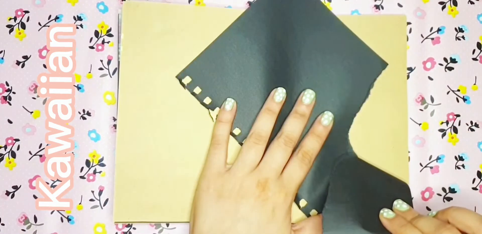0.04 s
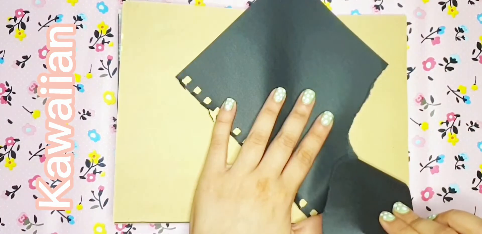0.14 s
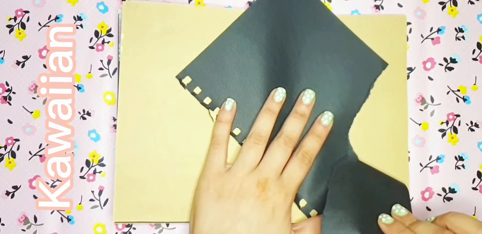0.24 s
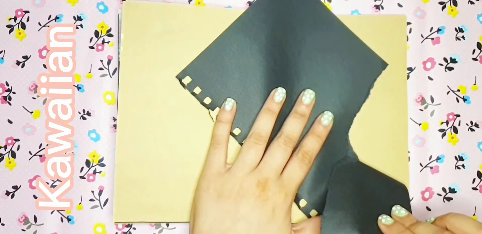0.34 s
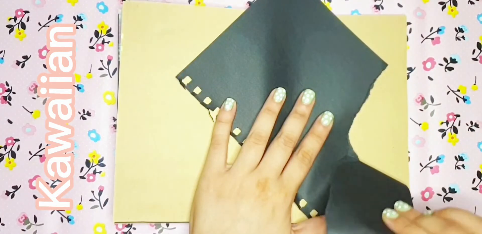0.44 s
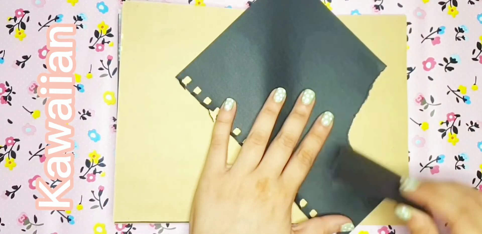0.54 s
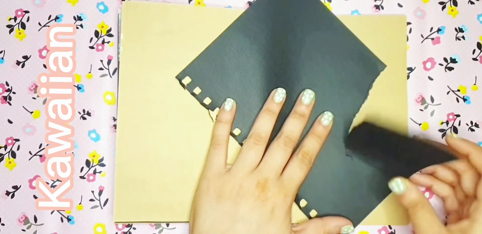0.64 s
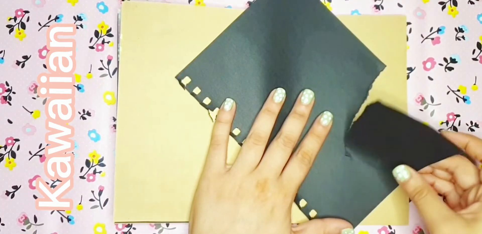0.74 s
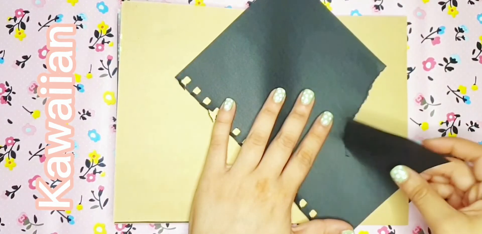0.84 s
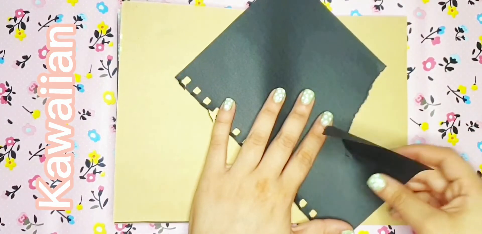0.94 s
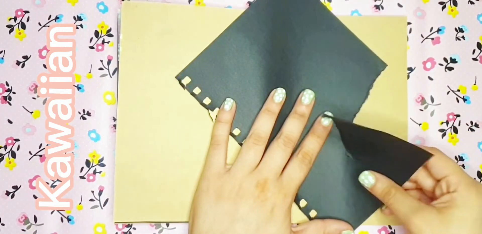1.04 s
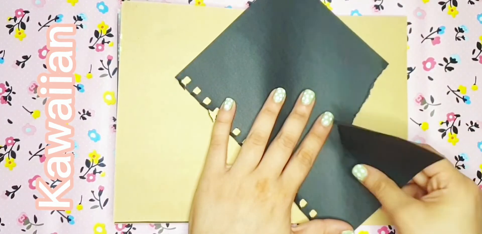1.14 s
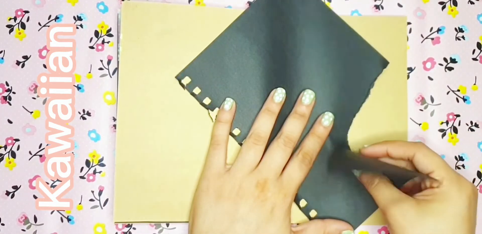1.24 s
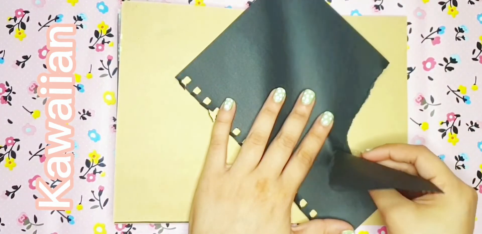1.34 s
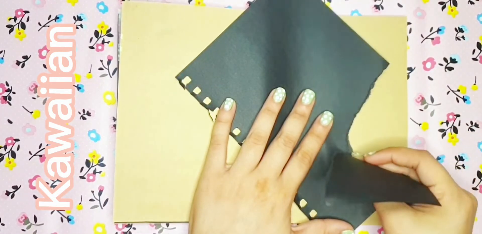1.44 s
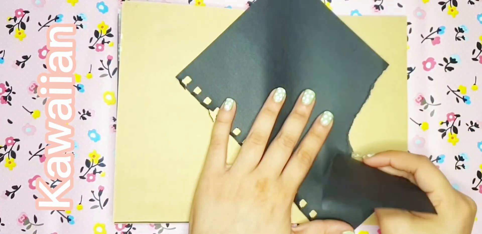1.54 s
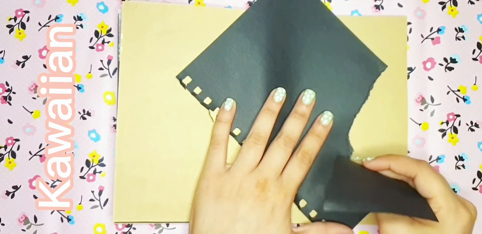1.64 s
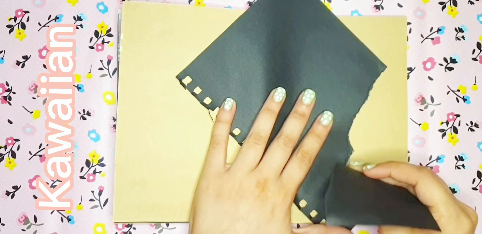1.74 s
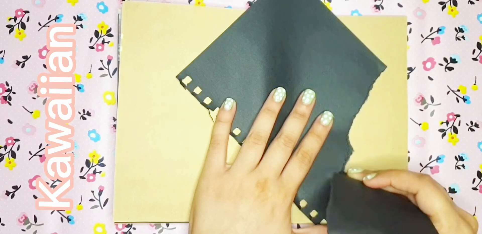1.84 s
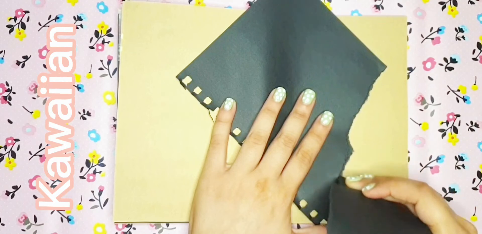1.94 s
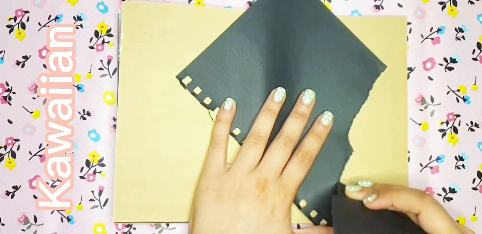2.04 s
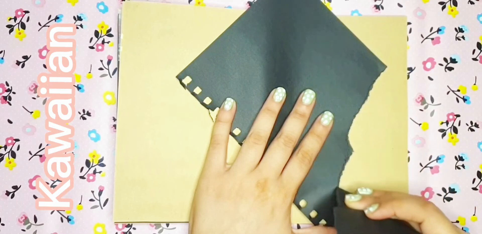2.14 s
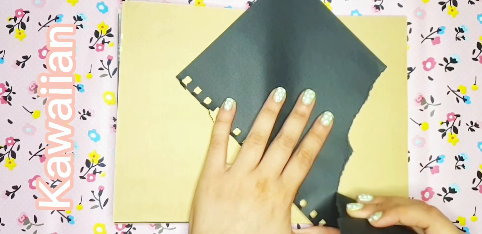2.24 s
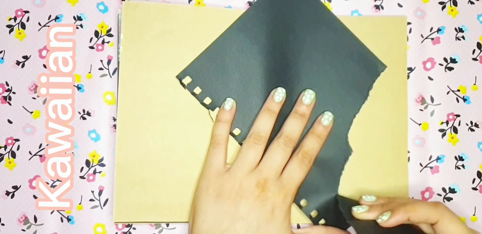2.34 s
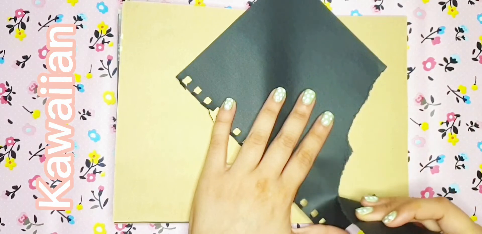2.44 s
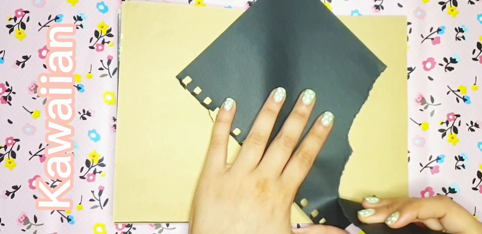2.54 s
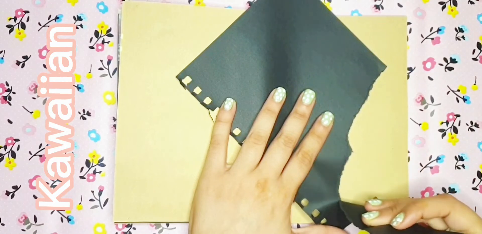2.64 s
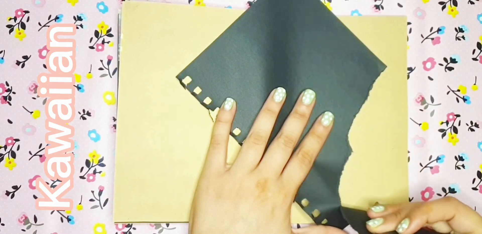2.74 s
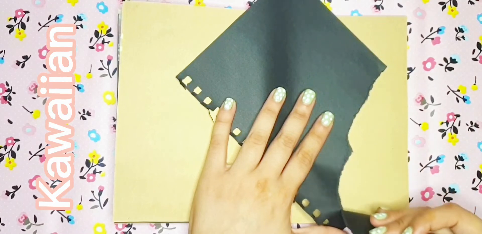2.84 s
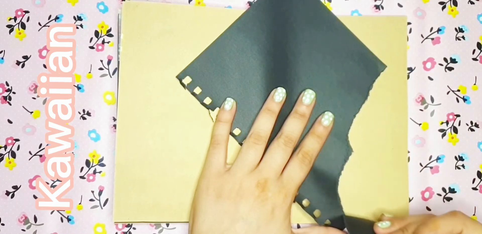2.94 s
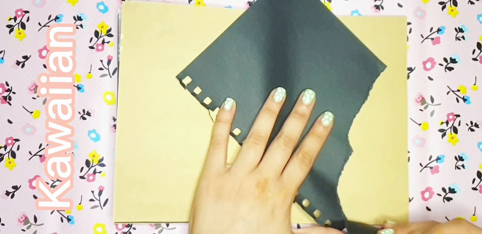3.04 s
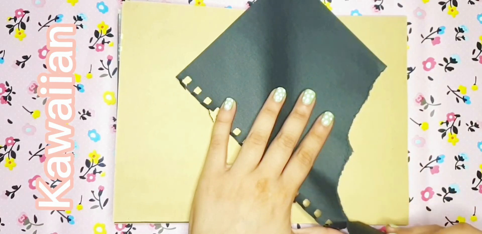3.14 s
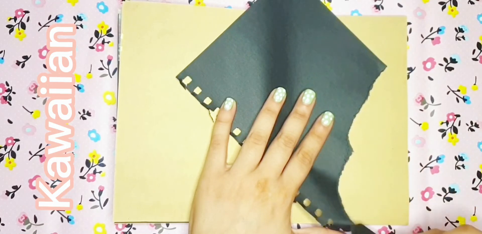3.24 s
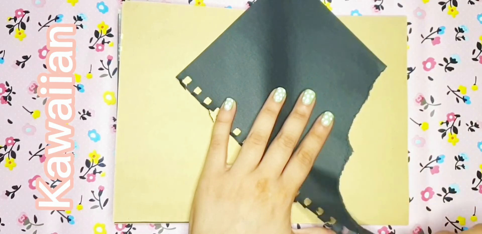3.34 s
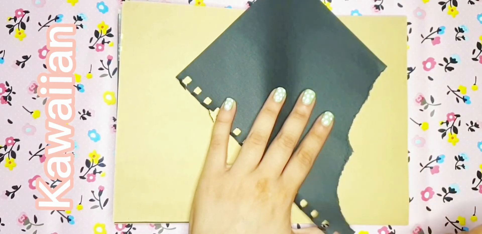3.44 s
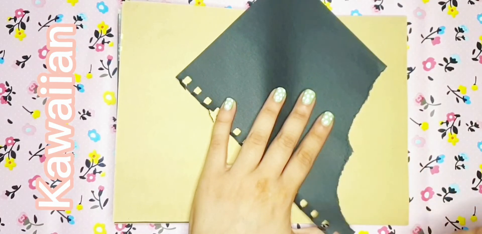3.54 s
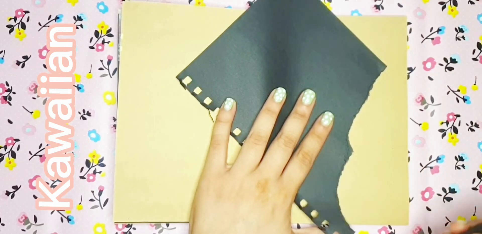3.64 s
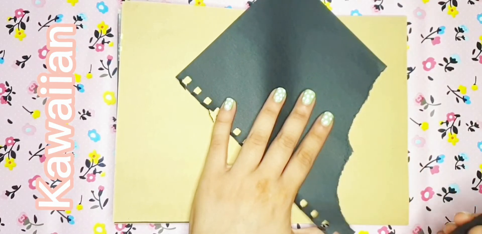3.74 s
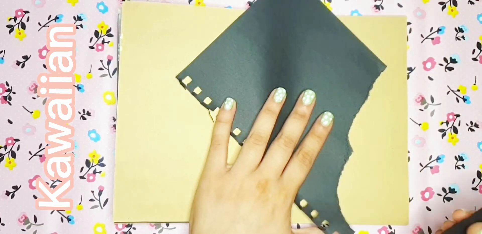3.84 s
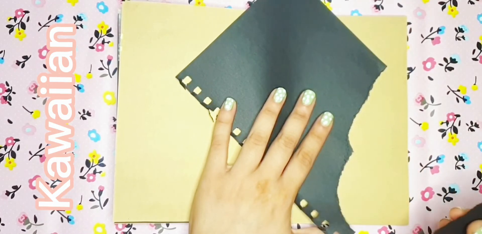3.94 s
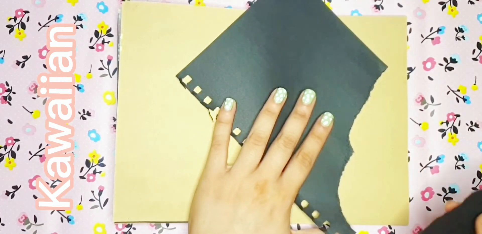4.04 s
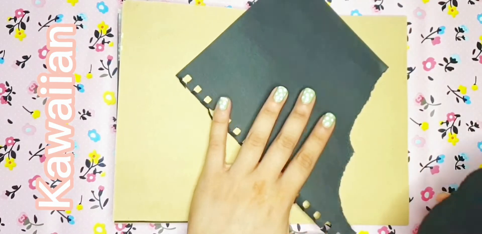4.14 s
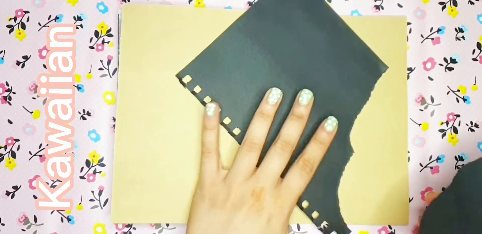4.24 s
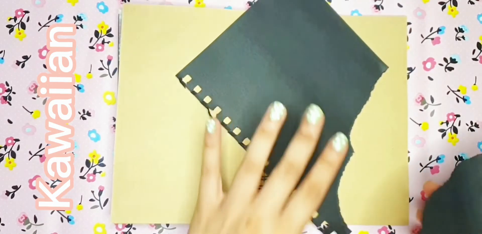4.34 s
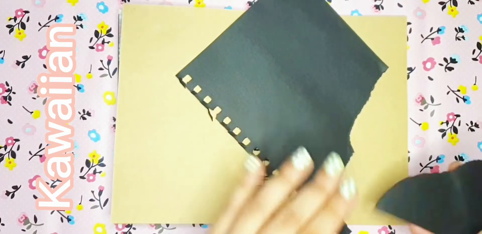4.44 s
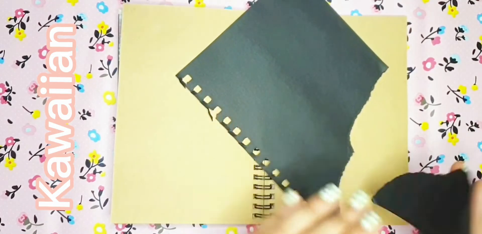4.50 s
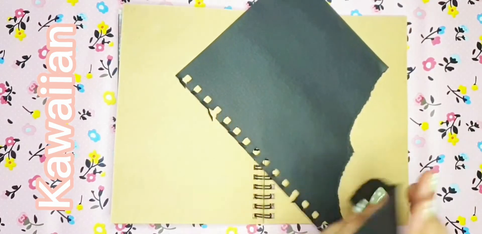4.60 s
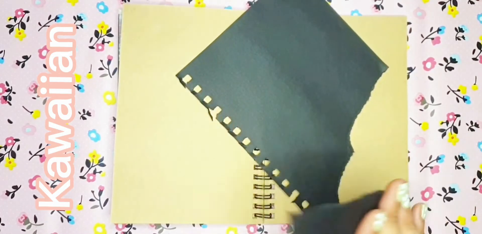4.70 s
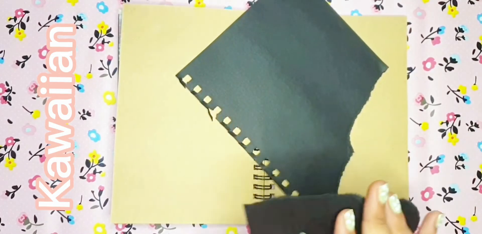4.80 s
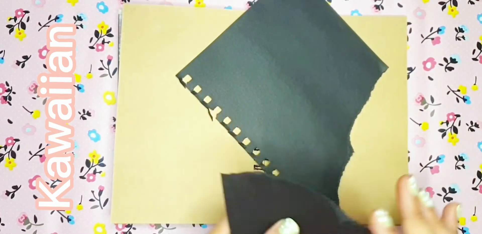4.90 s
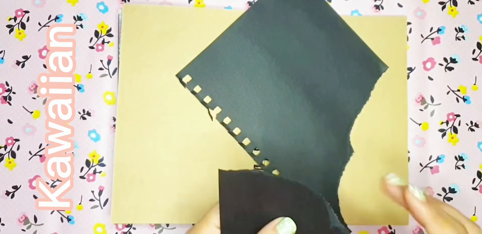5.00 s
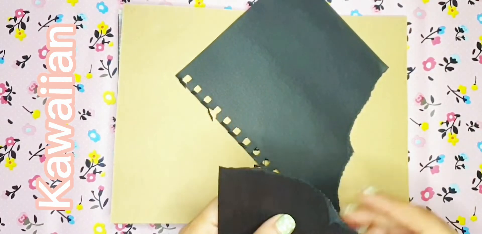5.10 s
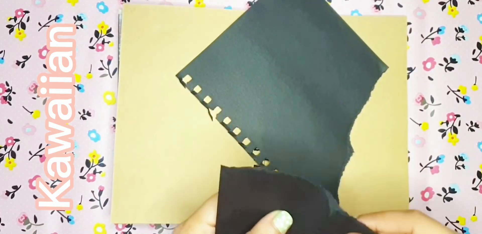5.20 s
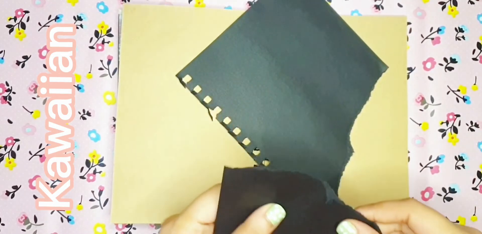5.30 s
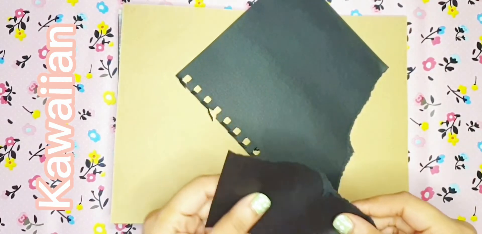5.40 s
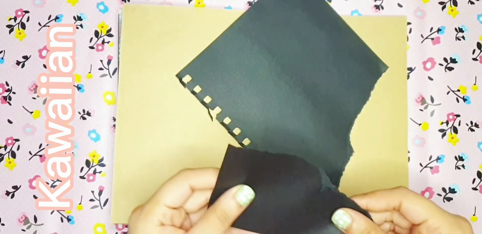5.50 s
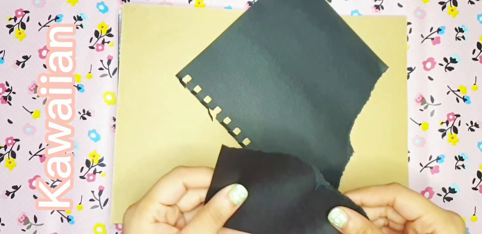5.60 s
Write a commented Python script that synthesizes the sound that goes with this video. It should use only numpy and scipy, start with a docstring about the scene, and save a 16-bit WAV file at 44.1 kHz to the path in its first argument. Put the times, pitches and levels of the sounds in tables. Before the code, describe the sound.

Close, dry ripping of thick paper in two long pulls with sharp snaps, followed by near silence and faint rustles and taps.

```python
"""Tearing stiff paper by hand

A sheet of stiff paper is held down on a notebook and torn, close to the microphone in a small quiet room.
A first light rip, then the long tear: fibres crackle and snap until the strip comes free and the piece is
handled again. Stick-slip clicks, filtered to the colour of the paper, make the tearing and rubbing;
short noise bursts make snaps, buckles and fingertip taps. Motors hum and throb faintly as sine tones."""
import sys
import numpy as np
from scipy import signal
from scipy.fft import rfft, irfft
from scipy.io import wavfile
from scipy.ndimage import uniform_filter1d

SR = 44100
rng = np.random.default_rng(int(sys.argv[2]) if len(sys.argv) > 2 else 0)


def wrap_up_sound(samples):
    """Save the sound to the file named by the first command line argument, as 16-bit audio."""
    columns = np.atleast_2d(samples).T
    # keep every value between -1 and 1, then stretch to whole-number steps
    tamed = np.clip(columns, -1, 1)
    steps = np.round(tamed * 32767).astype(np.int16)
    wavfile.write(sys.argv[1], SR, steps)


N = 249606
TIME = np.arange(N) / SR
TURN_S = 2.5   # from here on the strip hangs low and the paper rings differently

# sharp snaps of fibre bundles and creases, levels before lean and room: start_s, peak_db
SNAPS = [(.021, -41), (.055, -43), (.119, -34), (.19, -29), (.198, -29), (.26, -25), (.267, -30),
         (.302, -28), (.336, -30), (.352, -33), (.445, -33), (.452, -35), (.5995, -42), (.62, -43),
         (.9033, -33), (1.4989, -14), (1.5274, -23), (1.6417, -31), (1.6851, -23), (1.792, -22),
         (1.8238, -17), (1.8846, -21), (1.92, -19), (1.9445, -19), (1.9594, -20), (2.0403, -19),
         (2.157, -19), (2.2139, -21), (2.3604, -23), (2.401, -25), (2.5042, -27), (2.5207, -25),
         (2.5596, -21), (2.6135, -30), (2.6633, -23), (3.0744, -20), (3.0844, -20), (3.2241, -24),
         (3.3174, -18), (4.175, -45), (4.582, -50), (4.757, -42)]
# relative spectrum of a snap: frequency_hz, density_db (per Hz)
SNAP_COLOUR = [(200, -44), (600, -15), (1200, -8.5), (1900, -21.5), (2700, -7.5), (5300, -1.5), (7200, 2),
               (8500, -6.5), (12000, -2), (15000, -5.5)]


def amp(db):
    """Decibels to gain."""
    return 10 ** (np.asarray(db) / 20)


def rms_one(x):
    """Scale so that the centre of the stereo image has rms 1."""
    centre = np.atleast_2d(x).mean(axis=0)
    return x / np.sqrt(np.mean(centre ** 2) + 1e-20)


def at_hz(points, hz):
    """Read a table on a log-frequency axis."""
    f, value = np.transpose(points)
    return np.interp(np.log(np.maximum(hz, 1)), np.log(f), value)


def drift(rate):
    """Random wander of rms 1, in straight lines between `rate` random knots per second."""
    knots = rng.standard_normal(N // 20)
    return rms_one(np.interp(TIME * rate, np.arange(len(knots)), knots))


def cut(x, hz, kind, order=4):
    """Butterworth filter."""
    return signal.sosfilt(signal.butter(order, hz, kind, fs=SR, output="sos"), x + 1e-18)


def pan(x, left_db):
    """Lean a sound to the left by a level difference between the ears."""
    return x * amp([[left_db / 2], [-left_db / 2]])


def fading(kicks, fade_s):
    """Each kick jumps up at once and fades exponentially."""
    return signal.lfilter([1], [1, -np.exp(-1 / (fade_s * SR))], kicks + 1e-18)


def colour(x, spectrum, size=4096):
    """Causal filter with the given spectrum; the two ears agree in the bass and part in the treble."""
    # how alike left and right are: frequency_hz, likeness (1 = identical)
    likeness = [(100, 0.94), (400, 0.73), (1000, 0.68), (2500, 0.45), (4500, 0.1), (14000, 0.049)]
    hz = np.arange(size // 2 + 1) * SR / size
    # folding the cepstrum gives the minimum-phase response
    cepstrum = irfft(np.log(amp(at_hz(spectrum, hz))))
    cepstrum[1:size // 2] *= 2
    cepstrum[size // 2 + 1:] = 0
    response = rfft(irfft(np.exp(rfft(cepstrum))))
    alike = at_hz(likeness, hz)
    mid = signal.oaconvolve(x[0] + x[1], irfft(response * np.sqrt(1 + alike)))
    side = signal.oaconvolve(x[0] - x[1], irfft(response * np.sqrt(1 - alike)))
    return np.array([mid + side, mid - side])[:, :x.shape[1]]


def flutter(die_s, crack_s, size=4096):
    """One release of the sheet: a sharp crack, then bending waves that scatter and die (60 dB fall times)."""
    t = np.arange(size) / SR
    shape = amp(-60 * t / crack_s) + amp(-9.5 - 60 * t / die_s)
    waves = rng.standard_normal((2, size)) * shape
    return waves / np.sqrt(np.sum(waves ** 2, axis=1, keepdims=True))


def grains(per_s, spread_db, slips_per_s, slip_db, slip_s, die_s, count=10):
    """Stick and slip: each slip lets go a fading run of clicks; each spot on the sheet rings in its own way."""
    slips = (rng.random(N) < slips_per_s / SR) * rng.uniform(0, 1, N) ** 2
    strain = np.sqrt(1 + amp(slip_db) ** 2 * fading(slips, slip_s))
    sizes = amp(spread_db * np.minimum(rng.exponential(1, N), 3.5)) * rng.choice([-1, 1], N)
    clicks = sizes * strain * (rng.random(N) < per_s / SR)
    # even out the clicks' power over a short window, so that the gains set the loudness
    clicks = clicks / np.sqrt(uniform_filter1d(clicks ** 2, size=2000) + 1e-6)
    spot = rng.integers(0, count, N)
    out = np.zeros((2, N))
    for k in range(count):
        ring = flutter(die_s, crack_s=0.0011, size=256)
        out += signal.oaconvolve((clicks * (spot == k))[None], ring, axes=1)[:, :N]
    return out


def reflections(x, share, wander):
    """Page, hands and desk reflect the sound; the paths shift a little as the paper bends."""
    # delays of the nearby reflections: delay_s
    delays = [0.001358, 0.0019, .0047]
    out = x.copy()
    for ear in range(2):
        for delay_s in delays:
            late = TIME - delay_s * np.exp(wander * drift(4))
            out[ear] += share * np.interp(late, TIME, x[ear])
    return out


def hollow(x, gap_s, share, wander):
    """The air gap under the curling sheet opens and closes, so comb notches roam through the low mids."""
    late = TIME - gap_s * np.exp(wander * drift(16))
    return x + share * np.array([np.interp(late, TIME, ear) for ear in x])


def add(out, s, sound, peak_db):
    """Lay a short sound in at time s; its strongest half millisecond sets the level."""
    start = int(s * SR)
    part = sound[:, :N - start]
    peak = 2 * np.sqrt(uniform_filter1d(sound.mean(axis=0) ** 2, size=22).max())
    out[:, start:start + part.shape[1]] += part * amp(peak_db) / peak


def background():
    """Motor tones, a hum that throbs as its close tones beat, and the low rush of the room."""
    # steady motor tones: pitch_hz, rms_db (before the lean)
    steady = [(36.6, -67.5), (56.6, -62), (158, -74.5), (162, -79.5), (233.6, -77.5)]
    # motor tones close in pitch: pitch_hz, rms_db (before hum_db and the lean)
    beating = [(106.4, -69), (113.11, -59), (116.29, -64), (116.81, -66), (119.95, -63)]
    # relative spectrum of the rush: frequency_hz, density_db (per Hz)
    rush_colour = [(20, -9), (45, -2.5), (70, -17), (90, 4), (130, -9.5), (175, -4), (210, -19),
                   (300, -15.5), (420, -25.5), (650, -40.5), (2000, -42), (7000, -45), (8500, -49),
                   (15000, -41.5)]
    hum_db, crest_s = 2.5, 4.852   # at the crest the beating tones are in step
    tones = sum(amp(db) * np.sin(2 * np.pi * (hz * TIME + rng.random())) for hz, db in steady)
    hum = sum(amp(db + hum_db) * np.sin(2 * np.pi * hz * (TIME - crest_s)) for hz, db in beating)
    rush = amp(-59) * rms_one(colour(rng.standard_normal((2, N)), rush_colour))
    return np.sqrt(2) * (tones + hum) + rush   # a sine of rms 1 peaks at sqrt(2)


def strokes():
    """Gains of hiss and ring: each stroke gathers strength up to its crest and slackens again."""
    # strokes of light tearing, then of rubbing: crest_s, rise_s, fall_s, hiss_db, ring_db
    rows = [(.02, 0.087, 0.065, -60, -76), (0.198, 0.057, .12, -43, -57.5), (.34, 0.056, 0.088, -45, -63.5),
            (0.613, 0.017, 0.068, -55.5, -64.5), (.77, 0.049, 0.12, -63, -77.5),
            (.9, 0.031, 0.051, -59.5, -66), (1.04, 0.099, 0.12, -61, -110),
            (1.105, 0.022, 0.065, -63.5, -64.5), (1.31, 0.15, 0.065, -58, -77),
            (1.44, .08, 0.066, -72, -83), (4.18, 0.059, 0.074, -59.5, -74.5),
            (4.32, 0.14, 0.071, -61.5, -78.5), (4.501, 0.12, .13, -68, -86.5),
            (4.779, 0.037, 0.19, -57, -64), (4.95, 0.07, 0.1, -51.5, -63), (5.12, 0.14, 0.082, -62.5, -88),
            (5.31, 0.023, 0.036, -63, -75), (5.41, 0.057, 0.12, -59, -62), (5.54, 0.2, 0.16, -53, -97)]
    edge_db, roundness = 11.5, 1.88   # drop one rise or fall away from the crest; power of that slope
    power = 0
    for crest, rise, fall, *levels_db in rows:
        away = np.maximum((crest - TIME) / rise, (TIME - crest) / fall)
        shape = amp(-edge_db * np.minimum(np.abs(away), 10) ** roundness)
        power = power + np.outer(amp(levels_db), shape) ** 2
    return np.sqrt(power)


def light_tearing_and_rubbing():
    """Light tearing at first, then paper rubbing: finer, denser catches than the main tear, nearly a hiss."""
    # relative spectra before and after TURN_S: frequency_hz, density_db (per Hz)
    spectra = [
        [(290, -48), (500, -18), (544, -14), (691, -22), (762, -11), (941, -9), (1770, -20), (2450, -1),
         (3840, -7), (5310, -1), (6020, -5), (8560, -8), (12500, -6), (14400, -9)],
        [(290, -38), (500, -8), (731, -11), (1020, -2), (1460, -14), (1650, -9), (1960, -16), (2780, -2),
         (3890, -8), (4480, -2), (7030, 0), (8090, -7), (9710, -4), (14400, -7)],
    ]
    crinkle_db, crinkle_per_s = 1.43, 71   # the pressure of a stroke is never quite even
    catches = grains(per_s=10000, spread_db=1.5, slips_per_s=47, slip_db=-7.5, slip_s=0.003, die_s=0.0047)
    catches = reflections(catches, share=0.079, wander=0.14) * amp(crinkle_db * drift(crinkle_per_s))
    hiss, ring = strokes()
    out = np.zeros((2, N))
    for stage, spectrum in zip((TIME < TURN_S, TIME >= TURN_S), spectra):
        x = colour(catches, spectrum)
        body = hollow(x, gap_s=0.000817, share=1.0, wander=0.28)
        out += stage * hiss * rms_one(cut(x, 2660, "high"))
        out += stage * ring * rms_one(cut(body, [400, 2100], "band"))
    return out


def snapping():
    """A thick bundle of fibres or a crease gives way at once, and weaker fibres follow in a short run."""
    run_db, run_fade_s = -14, 0.0053   # start of the run relative to the snap's peak; its fade
    out, kicks = np.zeros((2, N)), np.zeros(N)
    for s, peak_db in SNAPS:
        add(out, s, colour(flutter(die_s=.011, crack_s=.0025), SNAP_COLOUR), peak_db)
        kicks[int(s * SR)] = amp(peak_db + run_db)
    run = grains(per_s=4200, spread_db=6.5, slips_per_s=33, slip_db=-1.0, slip_s=0.0039, die_s=0.0046, count=4)
    return out + fading(kicks, run_fade_s) * rms_one(colour(run, SNAP_COLOUR))


def stalls():
    """A thick bundle holds the paper back for a moment before it snaps: the tearing and rubbing dip."""
    stall_s, stall_db = 0.011, -5.5
    held = np.zeros(N)
    for s, _ in SNAPS:
        held[max(int((s - stall_s) * SR), 0):int(s * SR)] = 1
    return amp(stall_db * uniform_filter1d(held, size=64))


def tapping():
    """Soft fingertips landing on the paper give short dull knocks."""
    # fingertip landings, levels before lean and room: start_s, peak_db
    taps = [(0.601, -49.5), (0.620, -55), (1.099, -49), (4.176, -52), (4.833, -45), (5.21, -47.5),
            (5.369, -33)]
    # relative spectrum of a tap: frequency_hz, density_db (per Hz)
    tap_colour = [(200, -16), (600, 18.5), (1000, 24), (1400, 16), (2000, 0), (2800, 13.5), (4000, -116),
                  (15000, -71)]
    out = np.zeros((2, N))
    for s, peak_db in taps:
        add(out, s, colour(flutter(die_s=.012, crack_s=.003), tap_colour), peak_db)
    return out


def tugs():
    """Gains of crackle, ring and flapping: each tug bites quickly, slackens and lets go."""
    # tugs that start the main tear and free the strip: start_s, length_s, crackle_db, ring_db, flapping_db
    rows = [(1.475, 0.038, -50, -72, -91), (1.509, 0.056, -43, -53, -76), (1.628, 0.044, -45.5, -62, -71),
            (1.672, 0.042, -33, -45, -61), (3.214, 0.13, -40.5, -50.5, -62.5),
            (3.302, 0.079, -32.5, -46.5, -51.5), (3.384, 0.085, -39.5, -55.5, -60),
            (3.418, 0.1, -40, -53, -53.5), (3.506, 0.03, -39, -53, -55)]
    attack_s, sag_db_per_s, release_db_per_s = 0.018, 36, 379
    power = 0
    for start, length, *levels_db in rows:
        t = np.maximum(TIME - start, 0)
        fall_db = sag_db_per_s * t + release_db_per_s * np.maximum(t - length, 0)
        shape = np.minimum(t / attack_s, 1) * amp(-fall_db)
        power = power + np.outer(amp(levels_db), shape) ** 2
    return np.sqrt(power)


def pulls():
    """Gains of crackle, ring and flapping through the two long pulls, next to silent outside them."""
    # one list of points per pull, levels before the trim: time_s, crackle_db, ring_db, flapping_db
    both = [
        [(1.74, -51, -68, -76), (1.81, -35, -47, -55.5), (2.08, -37.5, -47.5, -55.5), (2.288, -36, -52, -90),
         (2.312, -37, -46, -96), (2.334, -33.5, -53, -66), (2.428, -44, -58, -57), (2.436, -43.5, -52, -60),
         (2.5, -48.5, -61, -59)],
        [(2.5, -59, -67, -65), (2.572, -42.5, -52.5, -65), (2.62, -44, -66.5, -59.5), (2.774, -40, -54, -62),
         (2.86, -37.5, -55.5, -55), (3.096, -40.5, -54.5, -57.5), (3.144, -40.5, -52.5, -89),
         (3.172, -37.5, -50, -66), (3.21, -60, -63, -62)],
    ]
    trim_db = [[1], [-0.5], [-2]]   # crackle, ring, flapping
    total = np.zeros((3, N))
    for rows in both:
        s, *columns = np.transpose(rows)
        total += [amp(np.interp(TIME, s, c, left=-140, right=-140)) for c in columns]
    return amp(trim_db) * total


def tearing():
    """The main tear: one stream of fibre breaks crackles directly and shakes the sheet and the loose strip."""
    # relative spectra before and after TURN_S: frequency_hz, density_db (per Hz)
    spectra = [
        [(150, -50), (250, -20), (334, -15), (574, -14), (988, -4), (1390, -11), (1820, -9), (1980, -13),
         (2430, -2), (3130, -1), (6940, -1), (8370, -9), (12200, -3), (14400, -8)],
        [(150, -46), (250, -16), (536, -4), (594, -12), (779, -16), (988, -4), (1390, -13), (1590, -6),
         (1950, -10), (2830, -4), (3970, -5), (6830, 0), (8510, -6), (14400, -4)],
    ]
    # relative spectrum of the loose strip: frequency_hz, density_db (per Hz)
    strip_colour = [(150, -12.5), (250, -3.5), (480, 1.5), (700, -8)]
    judder_db, judder_per_s = 2.0, 110   # the tear runs through thicker and thinner paper
    breaks = grains(per_s=4200, spread_db=1.5, slips_per_s=200, slip_db=5, slip_s=0.00073, die_s=0.0034, count=14)
    breaks = reflections(breaks, share=0.26, wander=.07) * amp(judder_db * drift(judder_per_s))
    crackle, ring, flap = tugs() + pulls()
    out = np.zeros((2, N))
    for stage, spectrum in zip((TIME < TURN_S, TIME >= TURN_S), spectra):
        x = colour(breaks, spectrum)
        body = hollow(x, gap_s=0.001078, share=1.0, wander=0.37)
        out += stage * crackle * rms_one(cut(x, 2300, "high"))
        out += stage * ring * pan(rms_one(cut(body, [700, 2100], "band")), left_db=2.5)
    strip = hollow(colour(breaks, strip_colour), gap_s=.0012, share=.9, wander=0.44)
    return out + flap * pan(rms_one(cut(strip, [150, 700], "band")), left_db=3.5)


def buckling():
    """The whole sheet pops into a new shape or jerks free: fuller and duller than a snap."""
    # pops, levels before lean and room: start_s, peak_db, upper_edge_hz
    pops = [(1.666, -30.5, 3500), (1.712, -25, 4000), (2.439, -28.5, 2500), (2.444, -32.5, 2000),
            (3.238, -38, 2500), (3.3167, -22, 7000), (3.32, -17.5, 6470), (4.782, -37, 4100),
            (4.787, -28, 4150), (4.796, -37, 2780), (4.92, -33, 3470), (4.925, -34, 2780),
            (4.952, -30.5, 5170)]
    # relative spectrum of a pop before its upper edge: frequency_hz, density_db (per Hz)
    pop_colour = [(100, -21), (180, 4), (280, -7.5), (420, 4), (560, 4), (750, -3), (1100, -5), (1900, -2),
                  (2900, 3.5), (3800, -5), (7000, 1.5), (15000, -10.5)]
    out = np.zeros((2, N))
    for s, peak_db, edge_hz in pops:
        pop = colour(flutter(die_s=.04, crack_s=.009), pop_colour)
        add(out, s, cut(pop, edge_hz, "low", order=2), peak_db)
    return out


def room(x, wet_db):
    """Diffuse reflections of a small room: a noise tail that builds up within milliseconds and dies away."""
    # relative spectrum of what the walls send back: frequency_hz, level_db
    wall_colour = [(150, 5.5), (600, -4), (1500, -0.5), (5000, 0.5), (14000, -1)]
    low_t60_s, high_t60_s = 0.32, 0.34   # time to fall by 60 dB
    t = TIME[:SR // 2]
    noise = colour(rng.standard_normal((2, len(t))), wall_colour) * (1 - np.exp(-(t / 0.0051) ** 2))
    low = cut(noise, 3000, "low", order=2) * amp(-60 * t / low_t60_s)
    high = cut(noise, 6300, "high", order=2) * amp(-60 * t / high_t60_s)
    tail = low - high
    tail /= np.sqrt(np.sum(tail ** 2, axis=1, keepdims=True))
    return x + amp(wet_db) * signal.oaconvolve(x, tail, axes=1)[:, :N]


def scene():
    """Paper close to the microphone in its room, the faint hum further to the left."""
    moving = stalls()
    paper = pan(moving * tearing() + snapping(), left_db=0.9)
    paper += pan(moving * light_tearing_and_rubbing(), left_db=2.0)
    paper += pan(buckling() + tapping(), left_db=3.0)
    return room(paper, wet_db=-7.5) + pan(background(), left_db=4.0)


def record(dry):
    """The top is cut steeply above 14.6 kHz."""
    return signal.sosfilt(signal.ellip(10, .2, 70, 14600, fs=SR, output="sos"), dry)


dry = scene()
out = record(dry)
wrap_up_sound(out)
```